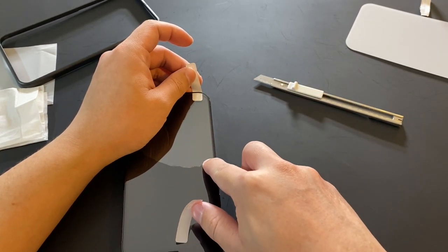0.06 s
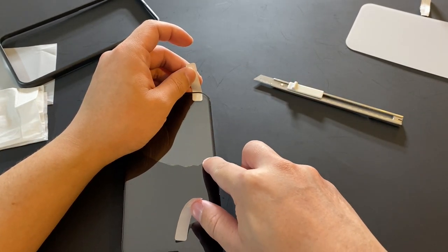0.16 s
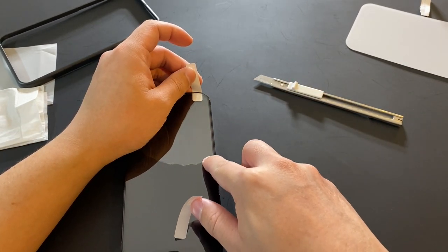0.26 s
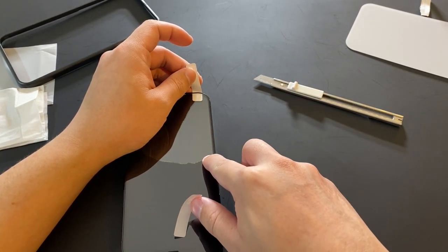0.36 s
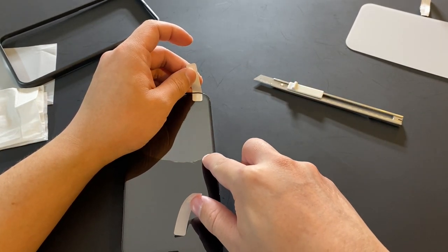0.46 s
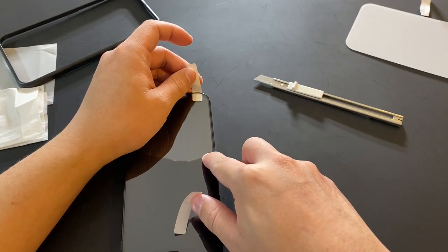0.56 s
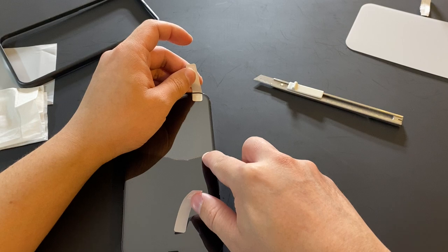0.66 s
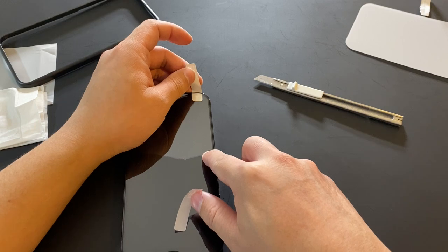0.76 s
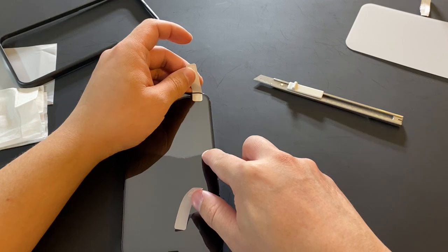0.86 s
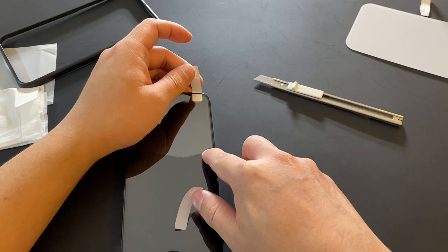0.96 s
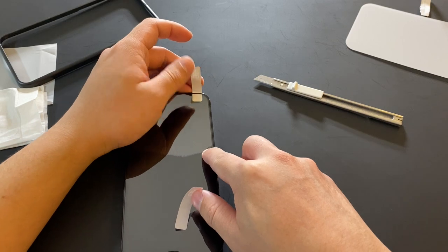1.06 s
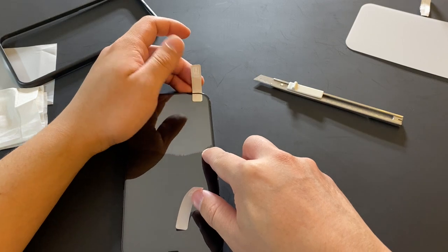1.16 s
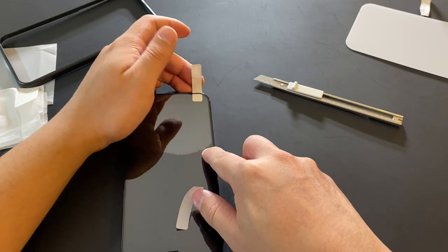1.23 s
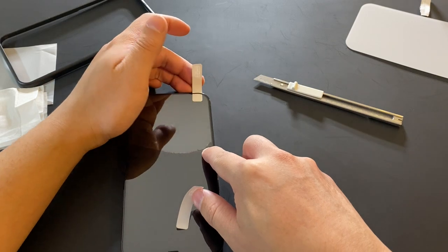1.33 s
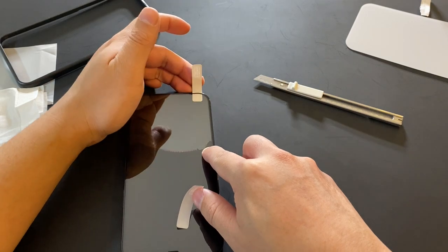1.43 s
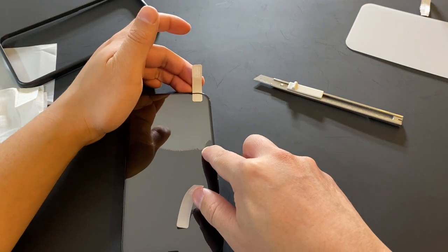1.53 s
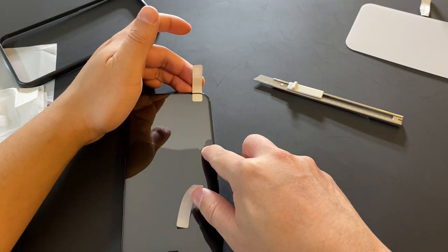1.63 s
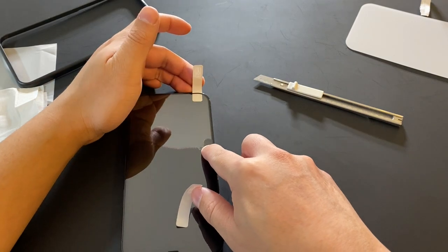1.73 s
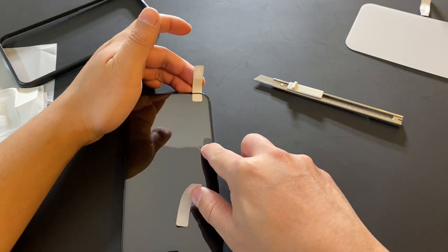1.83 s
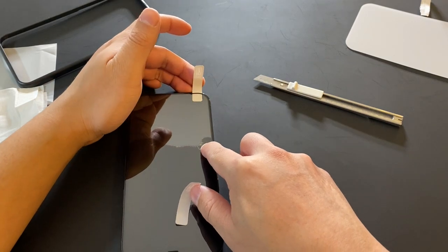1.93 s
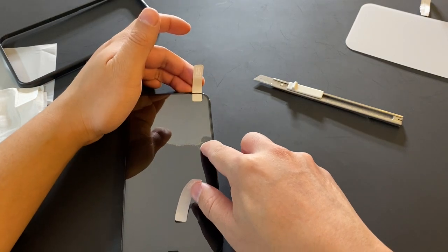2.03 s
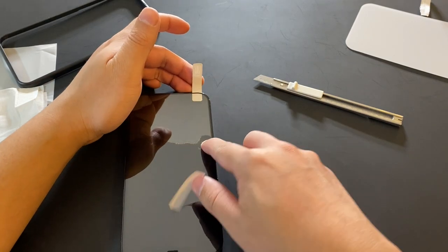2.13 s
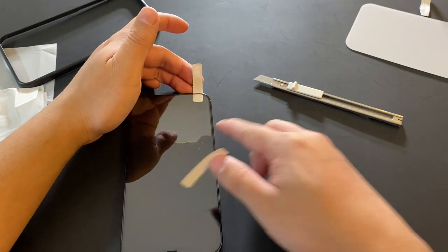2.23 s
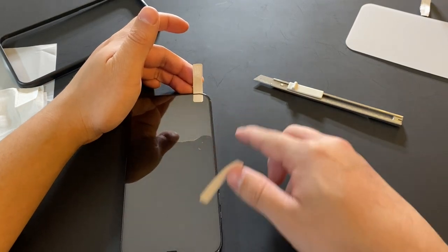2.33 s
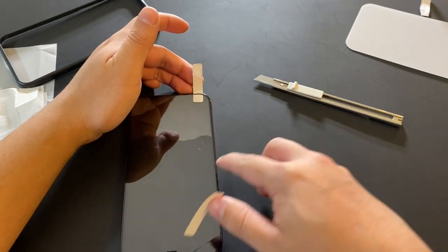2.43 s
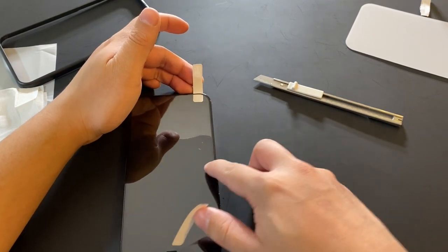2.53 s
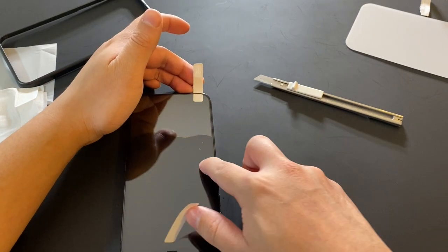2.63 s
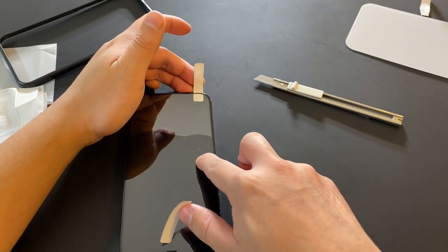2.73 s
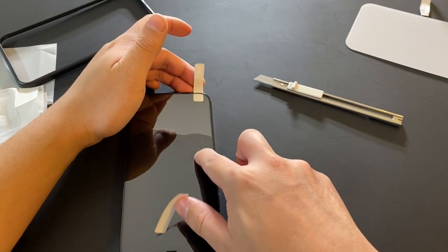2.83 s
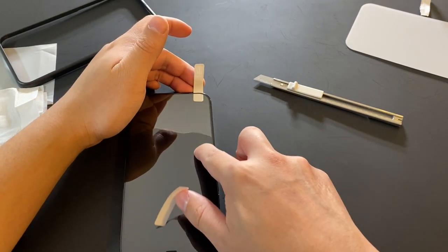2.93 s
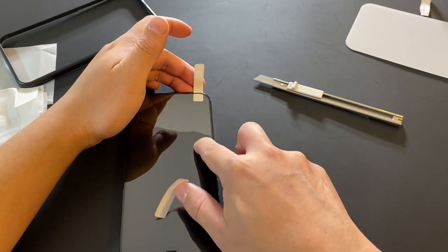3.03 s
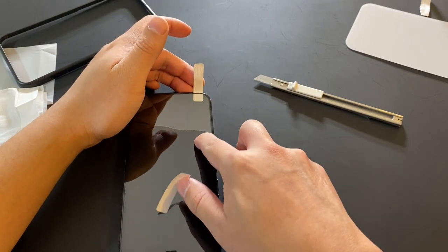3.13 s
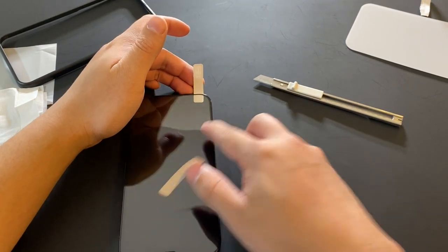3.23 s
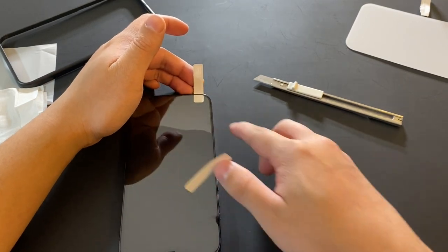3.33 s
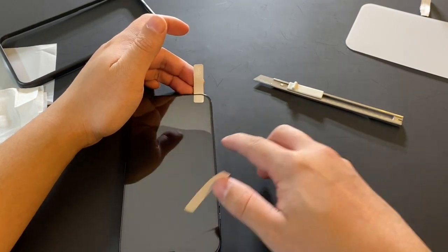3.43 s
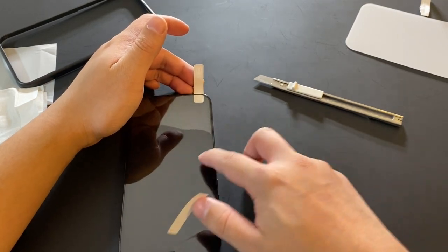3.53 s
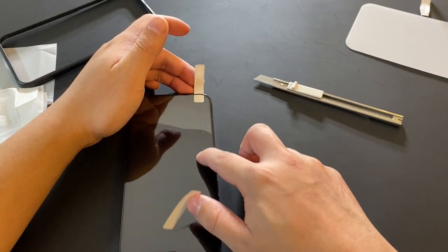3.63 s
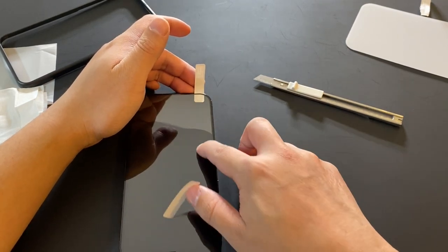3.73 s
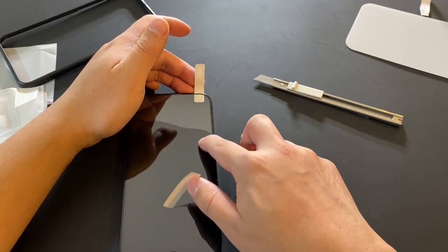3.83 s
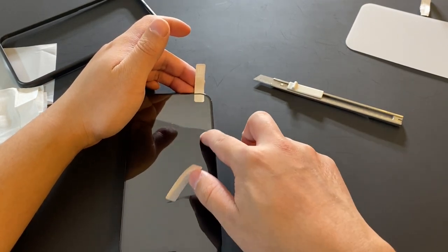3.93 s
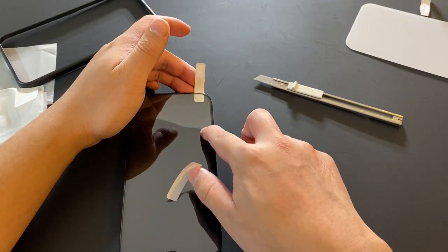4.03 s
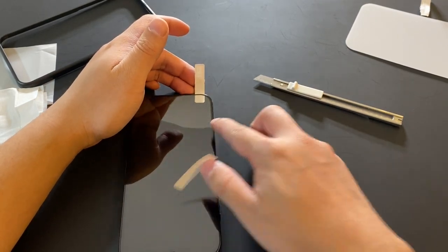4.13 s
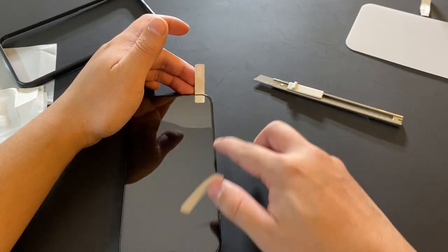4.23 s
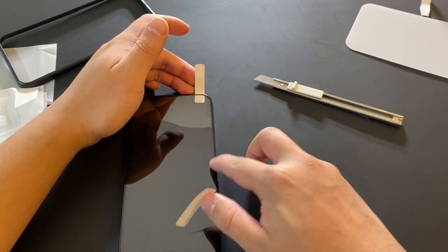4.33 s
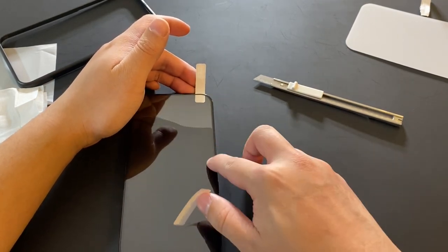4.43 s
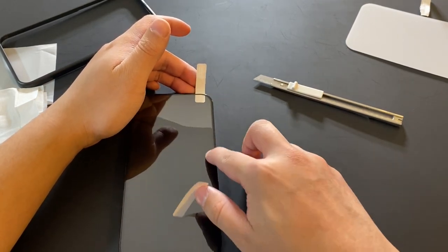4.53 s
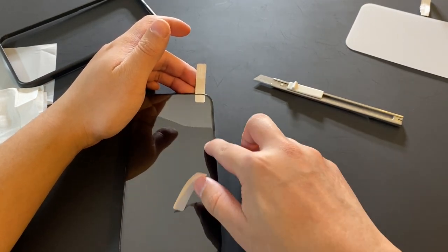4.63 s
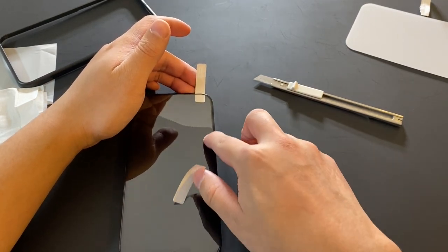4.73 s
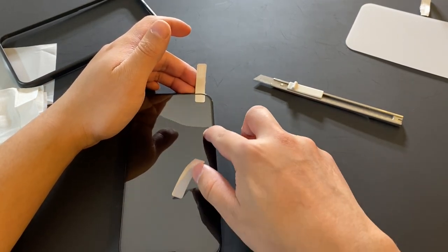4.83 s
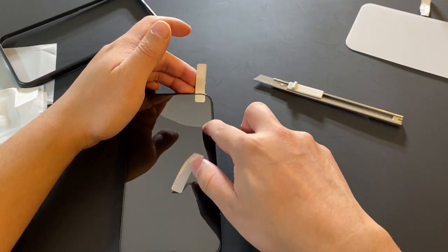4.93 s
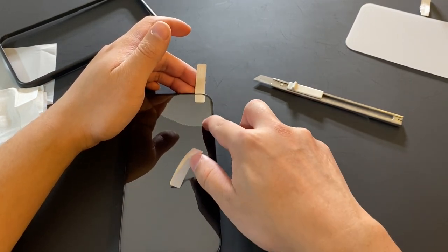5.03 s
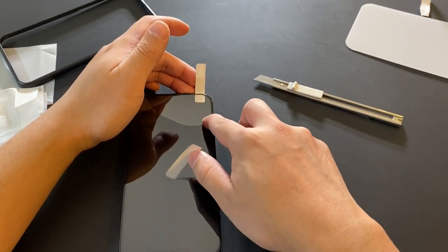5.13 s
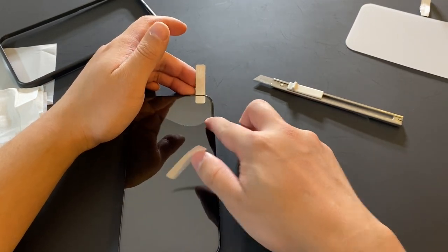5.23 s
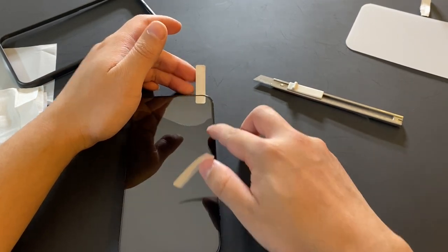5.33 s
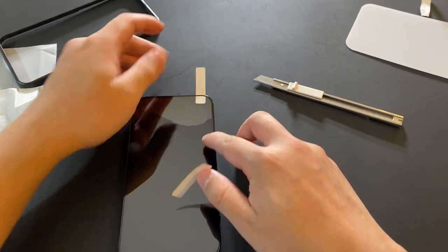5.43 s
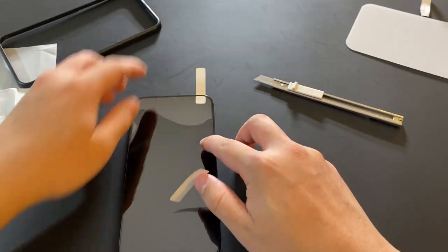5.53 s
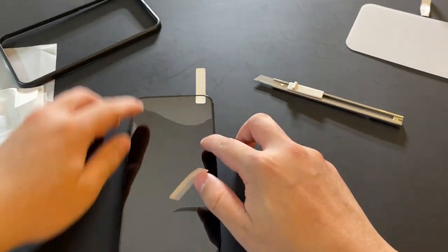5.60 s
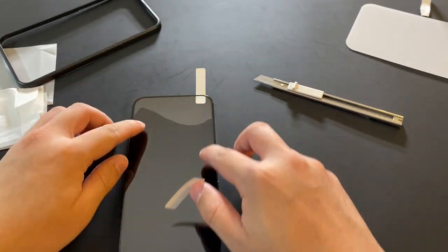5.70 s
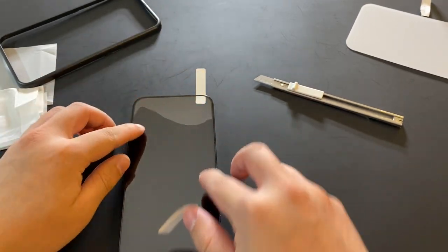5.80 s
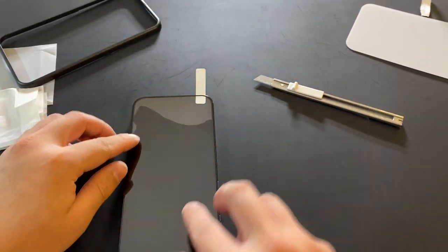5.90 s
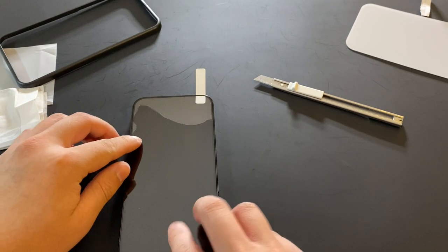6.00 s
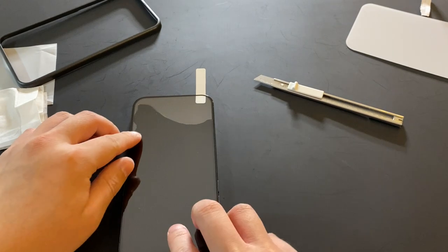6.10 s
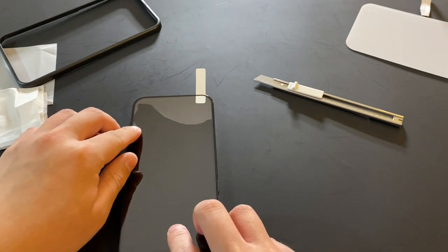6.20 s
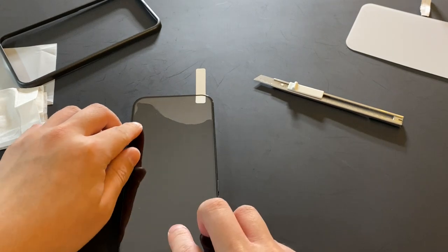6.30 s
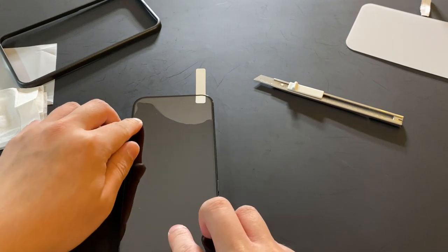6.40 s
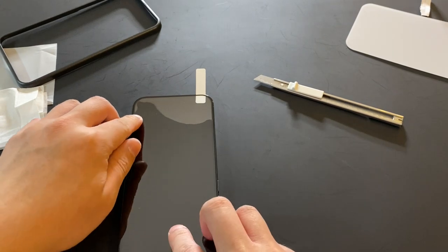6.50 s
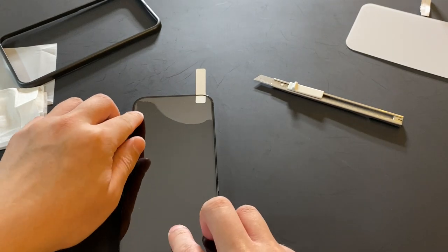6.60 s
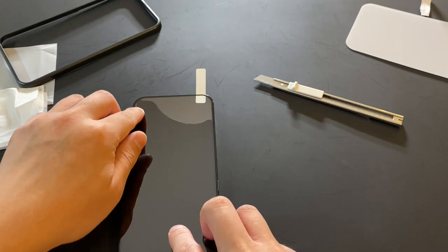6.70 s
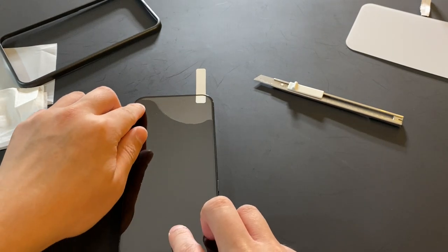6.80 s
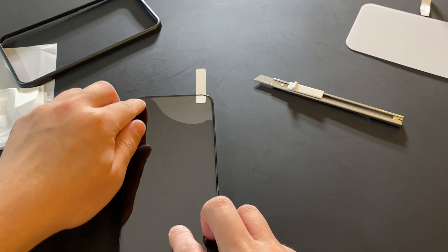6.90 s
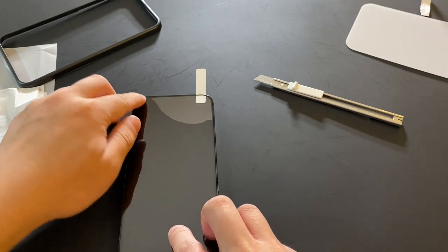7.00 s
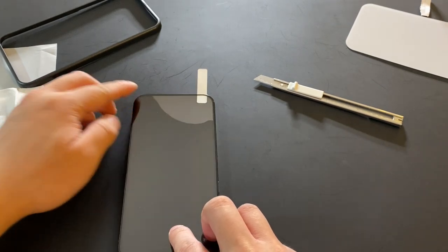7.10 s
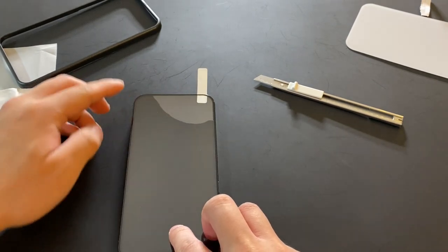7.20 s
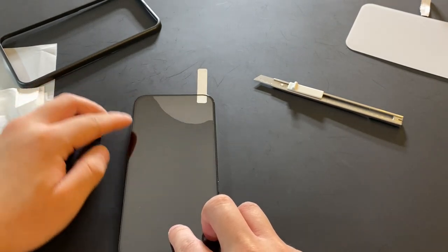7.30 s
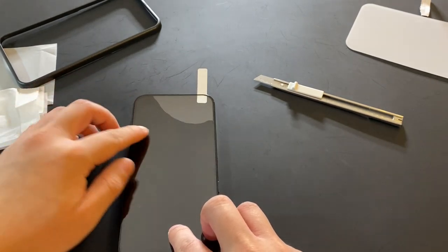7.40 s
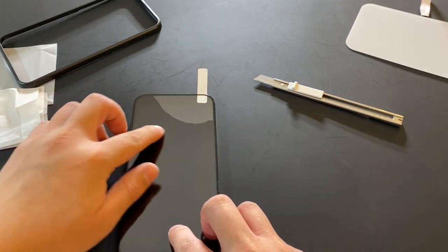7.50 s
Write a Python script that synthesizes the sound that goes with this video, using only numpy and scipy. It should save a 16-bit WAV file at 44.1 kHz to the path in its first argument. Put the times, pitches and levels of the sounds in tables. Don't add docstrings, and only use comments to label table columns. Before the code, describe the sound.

Fingertips tap a glass sheet onto a phone on a table, with skin rubs and tape ticks, then the phone knocks down hard.

```python
import sys
import numpy as np
from scipy import signal
from scipy.fft import rfft, irfft
from scipy.io import wavfile
from scipy.ndimage import uniform_filter1d

SR = 44100
rng = np.random.default_rng(int(sys.argv[2]) if len(sys.argv) > 2 else 0)


def voltage_ratio(decibels):
    exponent = np.asarray(decibels, float) / 20
    return 10 ** exponent


def materialize(psi):
    bounded = np.clip(np.atleast_2d(psi).T, -1, 1)
    quanta = np.round(bounded * 32767).astype(np.int16)
    wavfile.write(sys.argv[1], SR, quanta)


N = 332955
HZ = np.fft.rfftfreq(N, 1 / SR)
TIME = np.arange(N) / SR

# frequency in Hz, level in dB per Hz.
AIR_SPECTRUM = [(15, -48), (25, -37.5), (43, -6), (102, -11), (161, -11), (206, -4), (363, -17), (575, -20),
                (754, -23), (840, -22), (1260, -30.5), (1480, -33.5), (1700, -39.5), (16000, -71.5)]
# frequency in Hz, likeness from -1 to 1.
AIR_LIKENESS = [(60, 0.95), (130, 0.9), (290, 0.62), (640, -0.21), (1410, 0.17), (3100, -0.55),
                (6820, 0.37), (15000, 0.05)]
# start in seconds, hold in seconds, level in dB.
LOW_HUM_SWELLS = [(0.0, 0.46, -56), (0.8, 0.033, -50), (1.24, 0.3, -48), (1.65, 0.48, -53.5),
                  (2.05, 0.16, -46.5), (2.6, 0.064, -70), (3.55, 0.2, -56), (3.82, 0.057, -49),
                  (4.28, 0.21, -54), (4.76, 0.6, -54), (5.72, 0.2, -57), (6.56, 0.11, -53.5),
                  (6.95, .05, -64), (7.08, 0.029, -42)]
# start in seconds, hold in seconds, level in dB.
HIGH_HUM_SWELLS = [(0.53, 0.064, -56), (1.24, 0.043, -55), (1.5, 0.19, -49.5), (2.08, .04, -55.5),
                   (2.28, 0.072, -51), (3.28, 0.045, -45.5), (4.09, 0.098, -59.5), (4.18, 0.027, -37.5),
                   (5.28, 0.19, -52.5), (5.7, 0.041, -53), (6.42, .1, -58), (6.56, 0.095, -41),
                   (6.75, 0.27, -54), (7.08, 0.036, -50), (7.48, .07, -56)]
# start in seconds, hold in seconds, level in dB.
RUMBLE_SHAKES = [
    (2.18, 0.04, -59),
    (4.09, 0.041, -61),
    (5.9, 0.053, -67),
    (7.08, 0.033, -58),
]
SWELL_DB_S, SHAKE_RISE_DB_S, SHAKE_FALL_DB_S = 78, 181, 56
LOW_HUM_REST_DB, HIGH_HUM_REST_DB = -63, -68.5
RUMBLE_DB, RUMBLE_GROWS_DB_S = -70.5, 0.7336

# start in seconds, hold in seconds, level in dB.
PALM_BRUSHES = [
    (0.25, 0.1, -93),
    (1.8, 0.13, -91),
    (2.8, 0.14, -88.5),
    (5.95, 0.49, -87),
    (6.42, 0.64, -86.5),
    (7.28, 0.17, -77),
]
# start in seconds, hold in seconds, level in dB.
SKIN_SLIDES = [(0.872, 0.0067, -76), (2.08, .03, -102), (2.122, 0.11, -67), (2.22, 0.11, -74),
               (2.535, 0.071, -84), (2.63, 0.022, -76), (3.125, 0.065, -67), (3.23, 0.075, -67),
               (3.33, 0.11, -75.5), (3.44, 0.21, -72.5), (3.875, .025, -73), (4.03, 0.082, -69),
               (4.135, 0.067, -67.5), (4.28, 0.097, -74), (4.47, 0.15, -77.5), (4.85, 0.17, -78.5),
               (5.11, 0.085, -76), (5.305, 0.033, -66), (5.37, 0.041, -73.5), (5.58, 0.01, -61),
               (5.63, 0.19, -64.5), (5.77, 0.1, -64.5), (5.9, 0.14, -65.5), (6.055, 0.28, -68.5),
               (6.3, 0.12, -78), (6.96, 0.019, -70), (7.02, 0.21, -61.5), (7.29, .03, -85),
               (7.408, 0.018, -66)]
# start in seconds, hold in seconds, sizzle in dB, fine hiss in dB.
TAPE_PEELS = [(0.77, .05, -96, -95), (0.848, 0.013, -82, -78), (0.875, 0.023, -84, -87),
              (2.085, .05, -90, -92), (2.173, 0.025, -74, -73), (2.214, 0.098, -80, -77.5),
              (2.53, .07, -93, -97), (2.626, 0.013, -100, -85), (3.123, 0.047, -84, -89),
              (3.232, 0.046, -68, -67.5), (3.42, 0.058, -81.5, -86), (3.546, 0.081, -79, -94),
              (3.866, 0.029, -81, -90.5), (4.033, 0.069, -79.5, -83.5), (4.124, .06, -74, -78.5),
              (4.287, 0.12, -89, -91), (4.784, 0.076, -92.5, -97), (4.928, 0.068, -88.5, -91),
              (5.096, .03, -92, -98), (5.317, 0.089, -71, -70), (5.567, 0.036, -75.5, -79),
              (5.659, 0.096, -74, -79), (5.751, .09, -71.5, -72.5), (5.86, 0.034, -79, -99),
              (6.0, 0.045, -90, -94), (6.265, 0.056, -99, -106), (7.035, 0.11, -74, -74.5),
              (7.156, 0.082, -78.5, -82), (7.313, .03, -94, -88), (7.41, 0.016, -82.5, -99)]
# start in seconds, hold in seconds, level in dB.
TAPE_FLUTTERS = [
    (2.28, .05, -88),
    (3.225, .06, -75.5),
    (3.43, .07, -77.5),
    (3.54, 0.055, -81.5),
    (5.64, .05, -93),
    (6.27, 0.059, -92.5),
    (6.96, .05, -92),
]
# frequency in Hz, width in Hz, level in dB.
SHEET_RESONANCES = [(1200, 1200, 1), (2050, 450, -3), (2520, 300, 1), (3200, 500, -5), (3800, 300, -2)]
BRUSH_DB_S, SLIDE_RISE_DB_S, SLIDE_FALL_DB_S, PEEL_RISE_DB_S, PEEL_FALL_DB_S = 101, 396, 228, 707.5, 274
REST_BRUSH_DB, REST_SLIDE_DB, REST_SIZZLE_DB, REST_HISS_DB = -100, -100, -103, -108

# start in seconds, peak in dB, pitch in Hz, treble in dB, ring in seconds.
TAPE_TICKS = [(0.838, -68.5, 5000, 3, 0.0052), (0.8777, -31.5, 860, -22, 0.007),
              (0.8757, -56.5, 4320, -8, 0.011), (2.123, -61, 2900, -26, 0.033),
              (2.138, -55, 6560, -10, 0.013), (2.605, -52, 6040, -11, 0.0062),
              (3.162, -58, 6960, -22, 0.017), (3.628, -70, 5960, -32, 0.011),
              (4.2976, -54, 1000, -41, 0.036), (4.3002, -55, 3200, -32, 0.01),
              (4.3451, -41, 3600, -16.5, 0.004), (5.145, -60.5, 3500, -29, 0.017),
              (5.552, -61.5, 2850, -25, 0.048), (5.5773, -50.5, 4960, -33, 0.027),
              (5.8756, -44, 3020, -39, 0.012), (5.992, -56.5, 3420, -28, 0.045),
              (6.065, -68.5, 4600, -17, 0.022), (6.266, -64, 3700, -16, 0.01)]

# start in seconds, peak in dB, glass slap in dB, crack in dB, contact in ms.
FINGER_LIFTS = [
    (2.14, -18.5, -0.5, -21, 2.02),
    (2.195, -19, -7.5, -26, 2.4),
    (3.167, -17, -6, -25, 2.2),
    (3.214, -25, -19, -26, 1.5),
    (4.055, -16, -4.5, -27, 2.01),
    (5.151, -21.5, -11, -29.5, 2.21),
    (5.176, -23, -26, -32, 4.2),
    (6.994, -27.5, -15.5, -30, 2.4),
]
# start in seconds, peak in dB, glass slap in dB, crack in dB, contact in ms.
FINGER_PRESSES = [(2.146, -16.5, -16.5, -15, 0.84), (2.611, -21.5, -14, -23.5, 1.64),
                  (2.639, -28.5, 4, -23, 3.4), (4.061, -16, -28, -18.5, 2.13),
                  (4.105, -19.5, -24, -34, 2.25), (4.3, -31.5, -7.5, -21, 2.1),
                  (4.352, -18.5, -9, -18, 1.37), (4.379, -32, 16, -13, 3.5), (5.577, -41, -7, 0.5, 1.84),
                  (5.934, -34, -32, -31, 2.7), (5.977, -34.5, -33, -35, 2.7)]
# start in seconds, peak in dB, glass slap in dB, crack in dB, contact in ms.
PHONE_LANDING = [
    (7.033, -10, -9.5, -18, 0.33),
]
# start in seconds, peak in dB, glass slap in dB, crack in dB, contact in ms.
PHONE_KNOCKS = [
    (7.048, -10, -0.5, -8, 0.91),
    (7.089, -17.5, -18, -21, 0.85),
    (7.094, -17, -2.5, -18, 0.88),
]
LIFT_SLAP_HZ, PRESS_SLAP_HZ, LANDING_SLAP_HZ, KNOCK_SLAP_HZ = 624, 840, 870, 477
# frequency in Hz, level in dB, 60 dB decay in seconds.
TABLE_MODES = [(57, -8, 0.25), (96.4, -8, 0.27), (123.6, -4, 0.73), (135.7, -14.5, 0.32), (151.8, -4, 0.38),
               (176.7, -9, 0.25), (191.4, -0.5, 0.35), (232, 5, 0.079), (263.7, -4, 0.36),
               (298.8, 0.5, 0.12), (350, -2.5, 0.18), (388, 1, 0.079), (445.7, 2.5, 0.16), (467, -3, 0.16),
               (545.5, -9, 0.24), (675, -7, 0.14)]
# frequency in Hz, level in dB, 60 dB decay in seconds.
PHONE_MODES = [(55, -24, 0.26), (124.6, -13, 0.15), (161, -18, 0.32), (187.4, -7, 0.25), (259, 2.5, 0.063),
               (296, 2, 0.089), (416, -8.5, 0.088), (533, -4, 0.056), (746, -30, 0.098)]
# frequency in Hz, level in dB, 60 dB decay in seconds.
GLASS_MODES = [(819, -5.5, 0.034), (1000, -8.5, 0.031), (1293, -8, 0.043), (1505, -10, 0.045),
               (1853, -9, 0.055), (2086, -10, 0.034), (2593, -4.5, 0.032), (3200, -23, 0.044),
               (3426, -5, 0.055)]

# band centre in Hz, level in dB, 60 dB decay in seconds.
ROOM_BANDS = [(135.5, -35, 0.32), (315, -31, 0.32), (600, -28.5, 0.25), (1280, -23, 0.33),
              (2150, -30.5, 0.37), (4950, -23.5, 0.3), (9500, -23, 0.17)]
# frequency in Hz, left lead in radians.
PORT_PHASE = [(0, 0), (1500, .3), (3000, -.6), (6600, -.6), (8300, 2.7), (9300, 3.6), (10400, 5.9),
              (12000, 6.7), (12800, 9.0), (14300, 9.9), (15000, 12.5)]
# frequency in Hz, left minus right in dB.
PORT_LEVEL = [(60, 2), (400, 2.4), (700, -1.5), (1300, .8), (2400, -2.3), (4400, -2.2), (8000, -.3),
              (15000, 0)]


def along(table):
    hz, value = np.transpose(table)
    return np.interp(np.log(HZ + 1), np.log(hz + 1), value)


def band(x, hz, width_hz, order=1):
    for _ in range(order):
        x = signal.lfilter(*signal.iirpeak(hz, hz / width_hz, SR), x)
    return x


def cut(x, lo_hz, hi_hz, order):
    return signal.sosfilt(signal.butter(order, [lo_hz, hi_hz], "band", fs=SR, output="sos"), x)


def unit(x):
    return x / np.sqrt(np.mean(x ** 2))


def strokes(rows, rise_db_s, fall_db_s, rest_db):
    t, power = TIME[::SR // 1000], 0
    for s, hold_s, db in rows:
        below = rise_db_s * np.maximum(s - t, 0) + fall_db_s * np.maximum(t - s - hold_s, 0)
        power = power + voltage_ratio(db - below) ** 2
    return np.sqrt(np.interp(TIME, t, power) + voltage_ratio(rest_db) ** 2)


def add(out, s, x):
    i = int(s * SR)
    out[i:i + len(x)] += x[:N - i]


def hum(hz, width_hz):
    return unit(band(rng.standard_normal(N), hz, width_hz, order=2))


def rumble():
    alike = np.clip(along(AIR_LIKENESS), -.95, .99)
    colour = voltage_ratio(along(AIR_SPECTRUM))
    mid = irfft(rfft(rng.standard_normal(N)) * colour * np.sqrt(1 + alike), N)
    side = irfft(rfft(rng.standard_normal(N)) * colour * np.sqrt(1 - alike), N)
    rest_db = RUMBLE_DB + RUMBLE_GROWS_DB_S * TIME
    broad = strokes(RUMBLE_SHAKES, SHAKE_RISE_DB_S, SHAKE_FALL_DB_S, rest_db)
    air = unit(np.array([mid + side, mid - side])) * broad * voltage_ratio(12.0)
    low_swell = strokes(LOW_HUM_SWELLS, SWELL_DB_S, SWELL_DB_S, LOW_HUM_REST_DB)
    high_swell = strokes(HIGH_HUM_SWELLS, SWELL_DB_S, SWELL_DB_S, HIGH_HUM_REST_DB)
    low = hum(98.4, 14.3) * low_swell * voltage_ratio(-5.0)
    high = hum(202.54, 10.1) * high_swell * voltage_ratio(-5.5)
    return (air + low + high) * voltage_ratio([[.7], [-.7]])


def walk(rate):
    k = int(SR / rate)
    return uniform_filter1d(np.repeat(rng.standard_normal(N // k + 1), k), k)[:N]


def rubs():
    grains = rng.standard_normal(N) * voltage_ratio(0.5 * rng.exponential(size=N) + 1.8 * walk(60))
    brush = strokes(PALM_BRUSHES, BRUSH_DB_S, BRUSH_DB_S, REST_BRUSH_DB) * unit(cut(grains, 1400, 2800, order=4))

    sheet = sum(voltage_ratio(db) * band(grains, hz, 1.6 * w, order=2) for hz, w, db in SHEET_RESONANCES)
    sheet = unit(cut(sheet, 500, 4150, order=6))
    slide = voltage_ratio(-2.0) * strokes(SKIN_SLIDES, SLIDE_RISE_DB_S, SLIDE_FALL_DB_S, REST_SLIDE_DB) * sheet

    s, hold_s, sizzle_db, hiss_db = np.transpose(TAPE_PEELS)
    sizzle_gain = strokes(zip(s, hold_s, sizzle_db), PEEL_RISE_DB_S, PEEL_FALL_DB_S, REST_SIZZLE_DB)
    hiss_gain = strokes(zip(s, hold_s, hiss_db), PEEL_RISE_DB_S, PEEL_FALL_DB_S, REST_HISS_DB)
    sizzle = voltage_ratio(3.0) * sizzle_gain * unit(cut(grains, 4050, 7350, order=2))
    hiss = voltage_ratio(4.0) * hiss_gain * unit(cut(grains, 9800, 15600, order=2))

    tape_end = unit(band(grains, 6800, 1500, order=2))
    flutter = strokes(TAPE_FLUTTERS, PEEL_RISE_DB_S, PEEL_FALL_DB_S, -120) * tape_end
    return slide + sizzle + flutter + brush + hiss


def ticks():
    out, t = np.zeros(N), np.arange(SR // 20) / SR
    for s, db, hz, treble_db, t60 in TAPE_TICKS:
        grain, snap = rng.standard_normal((2, len(t))) * 1000 ** (-t / max(t60, .003))
        pitched = band(grain, hz, 0.88 * hz, order=2)
        treble = voltage_ratio(treble_db + 5.5) * band(snap, 12000, 7300, order=2)
        add(out, s, voltage_ratio(db + 9.0) * (pitched + treble))
    return out


def ring(modes, rise_cycles, length):
    t = np.arange(length)[:, None] / SR
    hz, db, t60 = np.transpose(modes)
    spread_db = 2.0 * rng.standard_normal(len(hz))
    weight = voltage_ratio(db + spread_db) * (-1) ** np.arange(len(hz))
    hz = hz * (1 + .015 * rng.standard_normal(len(hz)))
    rise = 1 - np.exp(-t * hz / rise_cycles)
    return (weight * rise * np.sin(2 * np.pi * hz * t) * 1000 ** (-t / t60)).sum(axis=1)


def blows(rows, body, body_db, slap_db, crack_db, crack_hz, crack_s, order):
    out, t = np.zeros(N), np.arange(SR // 20) / SR
    for s, db, slap, crack, contact_ms, slap_hz in rows:
        push = np.hanning(max(int(contact_ms * SR / 1000), 3) + 2)
        push /= push.sum()
        drum = signal.fftconvolve(ring(body, 0.062, SR // 2), push)
        add(out, s, voltage_ratio(db + body_db) * drum)
        sheet = [(slap_hz, 3.0, .02)] + GLASS_MODES
        glass = np.convolve(ring(sheet, 0.047, SR // 8), push[::2] * 2)
        add(out, s, voltage_ratio(db + slap + slap_db) * glass)
        grit = band(rng.standard_normal(len(t)), crack_hz, 1.11 * crack_hz, order=order)
        add(out, s, voltage_ratio(db + crack + crack_db) * grit * 1000 ** (-t / crack_s))
    return cut(out, 59, 20000, order=2)


def finger_taps():
    lifts = [(*r, LIFT_SLAP_HZ) for r in FINGER_LIFTS]
    presses = [(*r, PRESS_SLAP_HZ) for r in FINGER_PRESSES]
    return blows(sorted(lifts + presses), TABLE_MODES, -13, 1.34, 3.8, 1930, 0.022, order=2)


def phone_knocks():
    landing = [(*r, LANDING_SLAP_HZ) for r in PHONE_LANDING]
    rocking = [(*r, KNOCK_SLAP_HZ) for r in PHONE_KNOCKS]
    return blows(landing + rocking, PHONE_MODES, -9, -6.5, 3.8, 1400, 0.017, order=1)


def room(x):
    t, tail = np.arange(SR // 2) / SR, 0
    for hz, db, t60 in ROOM_BANDS:
        mid, side = (band(rng.standard_normal(len(t)), hz, 0.84 * hz, order=2) for _ in range(2))
        both = mid + min(hz / 650, 1.7) * side * np.array([[1], [-1]])
        tail = tail + voltage_ratio(db) / np.sqrt(hz / 1000) * both * 1000 ** (-t / t60)
    tail = tail * np.clip(t / .01, 0, 1)
    return signal.fftconvolve(x[None], tail * voltage_ratio(-8), axes=1)[:, :N]


def ports(x):
    turn = voltage_ratio(along(PORT_LEVEL) / 2) * np.exp(.5j * along(PORT_PHASE))
    return np.array([irfft(rfft(x) * turn, N), irfft(rfft(x) / turn, N)])


def scene():
    taps = finger_taps()
    knocks = phone_knocks()
    small = ticks()
    near = ports(taps + knocks + small + rubs())
    tail = room(taps + voltage_ratio(-2.5) * knocks + voltage_ratio(-3.5) * small)
    return near + tail + rumble()


def band_limit(x):
    return signal.sosfilt(signal.butter(12, 16500, fs=SR, output="sos"), x)


def record(dry):
    top = signal.ellip(8, .3, 60, 15850, fs=SR, output="sos")
    mix = signal.sosfilt(top, dry)
    return band_limit(mix)


dry = scene()
out = record(dry)
materialize(out)
```